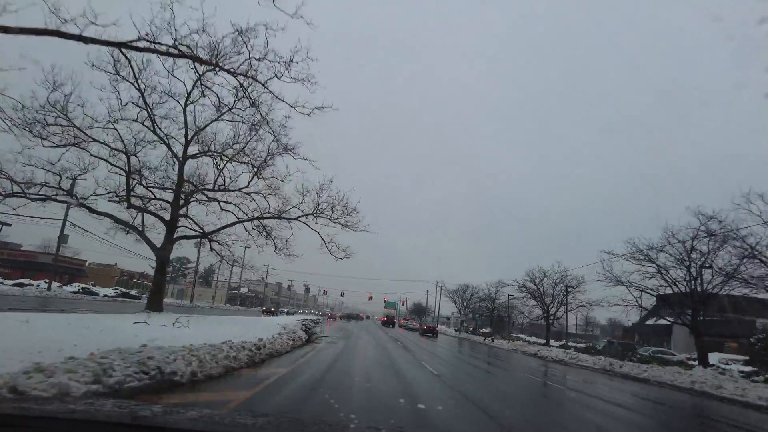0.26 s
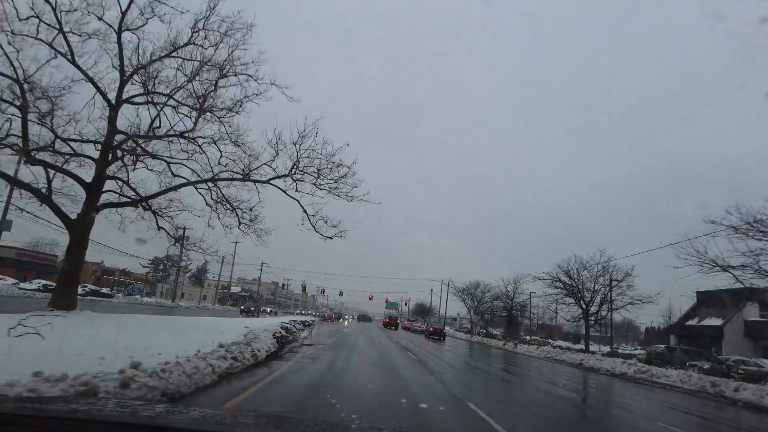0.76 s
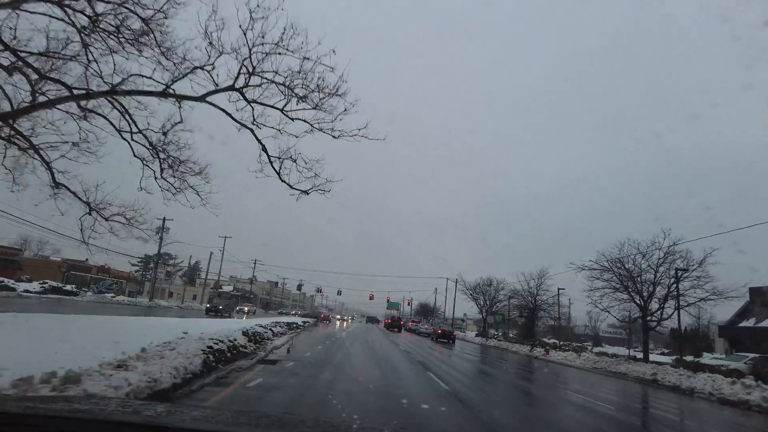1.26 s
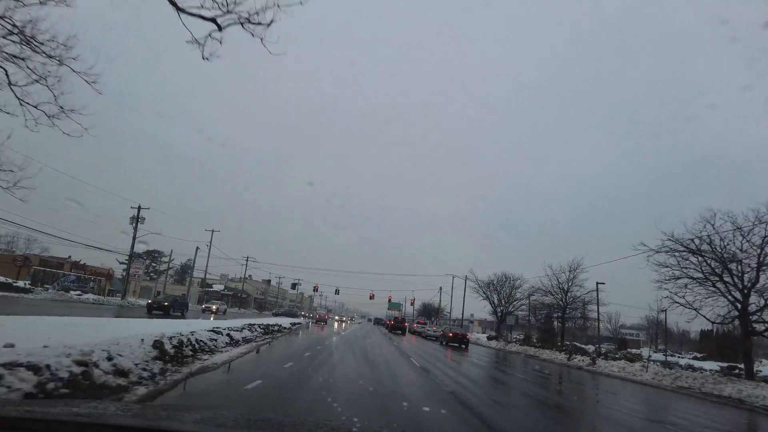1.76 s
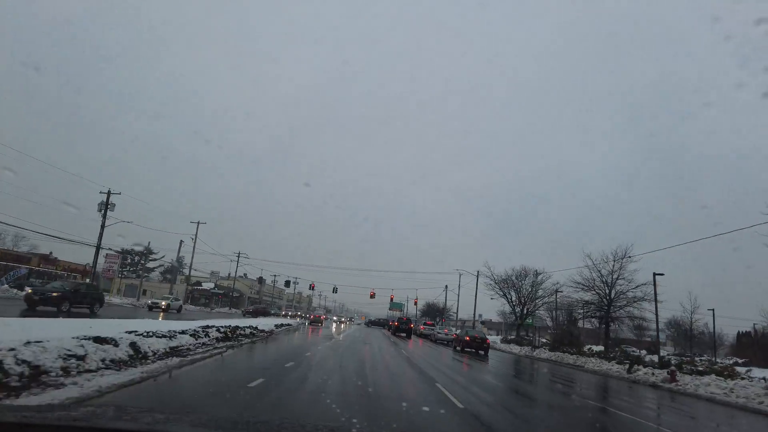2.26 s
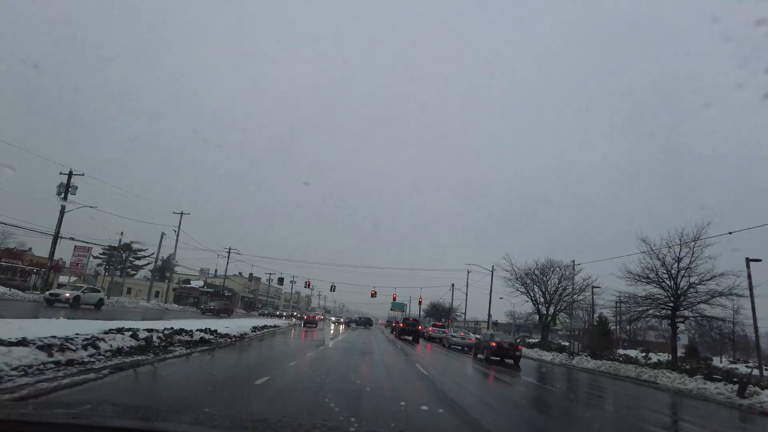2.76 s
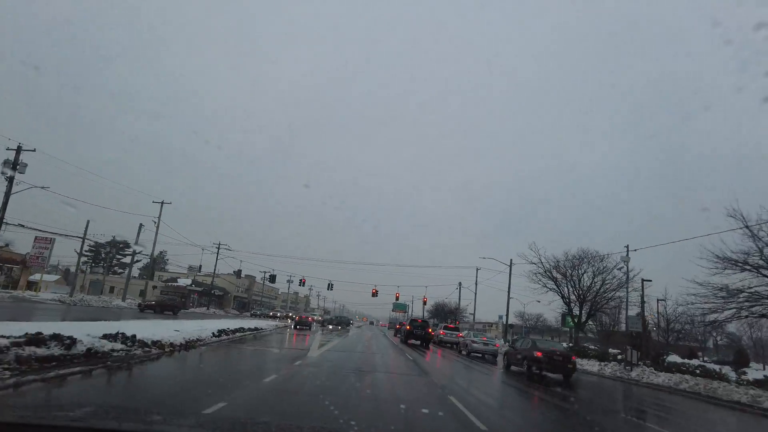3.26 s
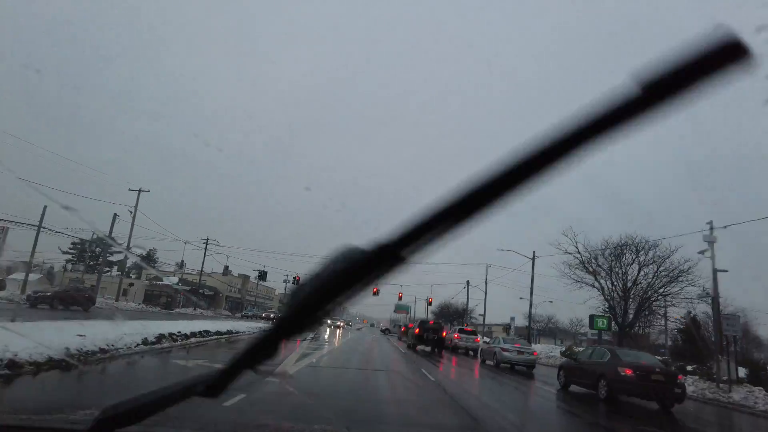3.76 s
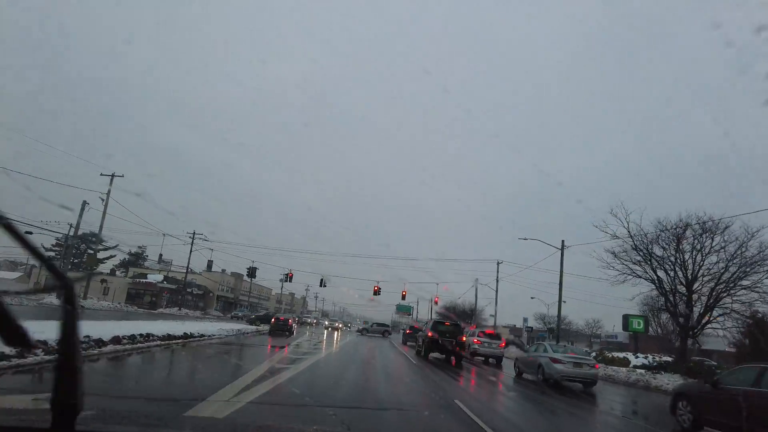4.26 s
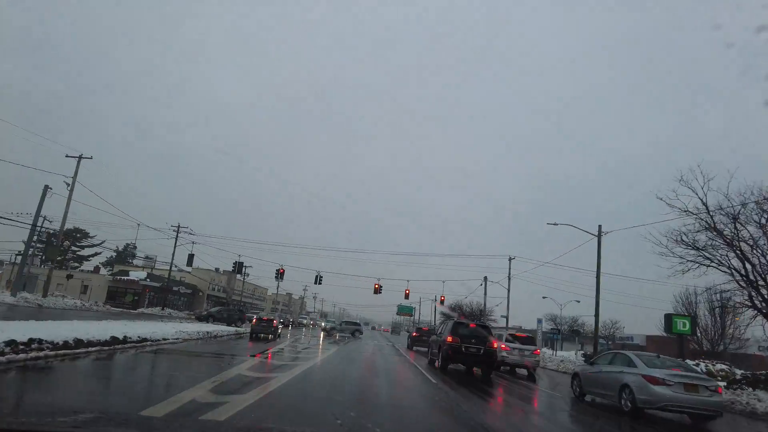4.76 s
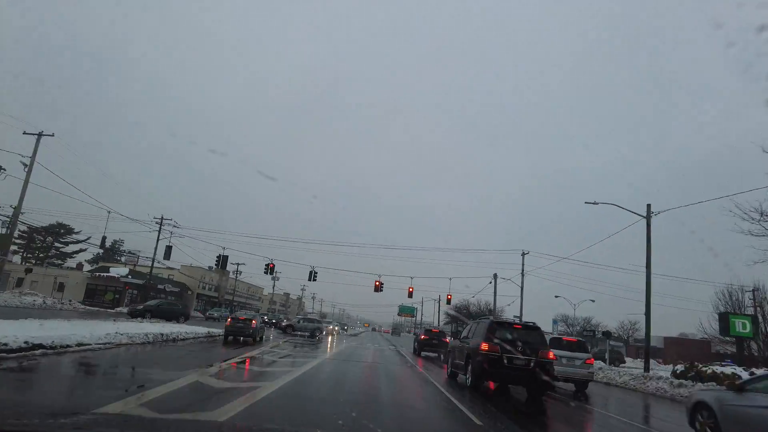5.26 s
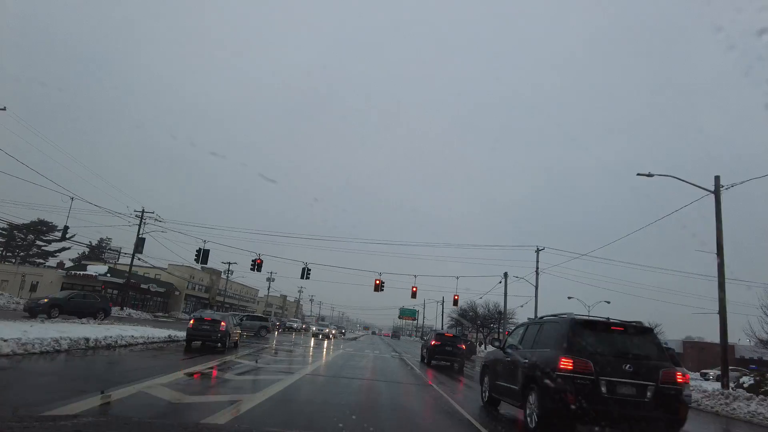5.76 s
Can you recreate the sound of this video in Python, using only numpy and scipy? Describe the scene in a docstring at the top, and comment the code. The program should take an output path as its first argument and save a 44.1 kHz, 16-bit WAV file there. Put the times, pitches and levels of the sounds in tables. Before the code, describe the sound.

Steady bassy road noise heard from the dashboard of a closed car, pulsing unevenly with the surface, with faint fan whine and barely audible drops. One wiper stroke interrupts it: a soft low thump, then a brief squeak and crisp rattling clack on the windscreen, then a light rubbery tick. The rumble continues while the air hiss gently fades, with a couple of muffled bumps near the end.

```python
"""Inside a car that slows down on a wet road: the cabin booms near 38 Hz over tyre and air noise.
The boom is a sine that swells over a narrow murmur; rumble, body, hiss and spray are shaped noise.
The wipers make one sweep: low thuds as they start and flip over, knocks that ring the windscreen,
small ticks and rubber chirps of resonant noise; dull low bumps follow once they have parked.
A fan motor whines as a thin sine; drops tick faintly."""
import sys
import numpy as np
from scipy import signal
from scipy.io import wavfile
from scipy.ndimage import uniform_filter1d

SR = 44100
rng = np.random.default_rng(int(sys.argv[2]) if len(sys.argv) > 2 else 0)


def to_linear_factor(level_db):
    """Convert decibel levels (scalar or array-like) to linear amplitude factors."""
    exponent = np.asarray(level_db, float) / 20
    return 10 ** exponent


def output_pcm(signal):
    """Save a mono or channel-first signal as 16-bit PCM at the path in sys.argv[1].

    Samples are clipped to [-1, 1] before scaling.
    """
    pcm = np.clip(np.atleast_2d(signal).T, -1, 1) * 32767
    wavfile.write(sys.argv[1], SR, np.round(pcm).astype(np.int16))


N = 265923

# boom swells on uneven road: (time of top [s], rms level [dB], width at half amplitude [s])
BOOM_SWELLS = [(0.083, -30, 0.03), (0.166, -26, 0.066), (0.259, -28, 0.11), (0.356, -28, 0.038),
               (0.461, -27.5, 0.13), (0.773, -32.5, 0.07), (0.878, -34.5, 0.046), (1.057, -33, 0.11),
               (1.138, -28, 0.057), (1.283, -33, 0.13), (1.416, -26, 0.046), (1.511, -28, 0.14),
               (1.739, -25.5, 0.12), (1.991, -24.5, 0.12), (2.181, -29, 0.1), (2.4, -36, 0.24),
               (2.563, -26, 0.047), (2.712, -35, 0.21), (2.862, -32.5, 0.12), (2.972, -31.5, 0.065),
               (3.187, -33, 0.055), (3.423, -30, 0.092), (3.48, -30.5, 0.074), (3.617, -30, 0.041),
               (3.78, -35, 0.15), (3.919, -33, 0.04), (4.018, -32, 0.024), (4.26, -48, 0.051),
               (4.407, -30, 0.059), (4.546, -33, 0.14), (4.741, -38, 0.085), (4.845, -32.5, 0.041),
               (5.06, -29.5, 0.028), (5.206, -36.5, 0.069), (5.31, -32, 0.051), (5.678, -29.5, 0.037),
               (5.826, -31, 0.21), (6.029, -28.5, 0.081)]
# boom pitch before its random waver: (time [s], frequency [Hz])
BOOM_PITCH = [(0.0, 39.7), (0.07, 37.8), (0.72, 38.07), (0.79, 38.06), (1.48, 38.86), (1.59, 37.49),
              (2.75, 36.57), (2.84, 39.59), (3.32, 41.03), (3.41, 38.84), (4.59, 37.47), (4.72, 31.15),
              (4.82, 31), (4.9, 35.06), (5.24, 40.02), (6.03, 38.58)]
# wiper arms jerk off their rests and turn at the top: (time [s], peak [dB], frequency [Hz], rise [s])
THUDS = [(3.5815, -31, 176, .0095), (4.2215, -38, 265, .008), (4.2225, -41, 420, .006),
         (4.2355, -42, 450, .008), (4.228, -37.5, 162, .026)]
# blade blows on the glass: (time [s], gain [dB], time to peak push [s], tilt [dB/octave], share of free t60 [1])
KNOCKS = [(3.603, -47, .005, -6.5, .6), (3.622, -49, .006, -6.5, .6), (3.655, -52, .008, -7, .7),
          (4.2205, -47, .0006, -2.5, .4), (4.2235, -46, .0004, 0, .35), (4.226, -41, .0002, 0.5, .4),
          (4.2285, -43, .0006, 0, .5), (4.2298, -43, .0008, -3, .5), (4.2335, -44, .0008, -1.5, .6),
          (4.238, -46, .001, -3, 1.2), (4.243, -50, 0.002, -2, 0.4), (4.258, -48, 0.0012, -2.5, 0.3)]
# windscreen and arm modes: (frequency [Hz], level before tilt [dB], free t60 [s])
GLASS_MODES = [(156.6, -12.5, 0.49), (192, -4.5, 0.033), (255.2, 3, 0.066), (342, -8, 0.081),
               (390, 4, 0.068), (560, 2.5, 0.074), (727, 2, 0.052), (930, -3, 0.07), (1150, -6, 0.071),
               (1250, -2, 0.086), (1487.6, 0, 0.046), (1860, -4.5, 0.027), (2090, -7.5, 0.084),
               (2420, -10, 0.025), (2730, -17.5, 0.019), (3080, -18.5, 0.014), (3800, -15, .015),
               (4470, -16, 0.032), (5600, -12, 0.015), (7100, -15.5, 0.012), (9000, -26, 0.0088)]
# broad ticks of drops and catching rubber: (time [s], level [dB], centre [Hz], t60 [s])
TICKS = [(0.021, -80, 7000, 0.066), (0.428, -59.5, 3800, 0.015), (0.501, -65, 3600, 0.022),
         (.5, -74, 6500, 0.017), (.805, -73, 7300, 0.018), (.83, -80.5, 9850, 0.079),
         (3.392, -71.5, 9000, 0.031), (3.584, -66, 3605, 0.078), (3.615, -69.5, 3800, 0.076),
         (3.716, -63.5, 3000, 0.039), (3.797, -75, 3980, 0.052), (3.86, -61, 3485, 0.038),
         (4.023, -68, 5760, 0.061), (4.136, -57.5, 3492, 0.06), (4.145, -70, 3600, 0.03),
         (4.154, -65, 3400, 0.03), (4.182, -63, 5000, 0.04), (4.194, -66, 6000, 0.053),
         (4.267, -62, 4600, 0.053), (4.671, -72, 4970, 0.046), (4.76, -75.5, 8000, 0.16),
         (4.769, -66, 3202, 0.06), (4.781, -56, 2600, 0.036), (4.787, -62, 4050, 0.03),
         (4.793, -62, 3000, 0.049), (4.799, -62, 2501, .04), (4.8047, -50.5, 3300, .011),
         (4.808, -59, 2200, 0.062), (4.226, -47.5, 3330, 0.055), (4.242, -73, 7000, 0.055),
         (4.129, -66, 10930, .07)]
# narrow chirps of rubber, then dull low bumps after the wipers have parked:
# (time [s], level [dB], start frequency [Hz], t60 [s], slide [octave/s])
CHIRPS_AND_BUMPS = [(4.124, -65, 7940, 0.037, 0), (4.133, -57, 4420, 0.037, -2),
                    (4.157, -68, 6400, 0.05, 0), (4.168, -70, 6500, .045, -9), (4.163, -66, 3900, .04, -4),
                    (4.171, -63, 4200, .035, -5), (4.178, -87, 13200, .12, 0),
                    (4.184, -65, 4800, 0.045, -6), (4.185, -64, 6000, 0.05, 8),
                    (4.681, -74.5, 9400, 0.1, -7), (4.746, -73, 7400, 0.09, -4),
                    (4.756, -71, 7000, 0.045, -40), (4.77, -77, 9700, .08, -6),
                    (4.773, -53.5, 1150, 0.068, 1), (4.81, -69, 3806, 0.039, 4), (5.613, -49, 680, .05, 0),
                    (5.616, -52, 1000, 0.035, -1), (5.749, -54, 756, 0.03, -2)]
# blade edge snaps over: (time [s], level [dB], lowest frequency [Hz], t60 [s])
SNAPS = [(4.129, -63, 4200, 0.05), (4.828, -60.5, 3540, 0.047)]
# overtones of a snap: (multiple [1], relative level [dB], width as share of the ring's pitch [1])
SNAP_RINGS = [(1, 1, 0.65), (2, -8, 0.16), (3, -9.5, 0.38), (4, -13, .2)]
# fan motor pitch before its wobble: (time [s], frequency [Hz])
WHINE_PITCH = [(0, 843), (.7, 838), (1.5, 845), (2.8, 848), (4.1, 846), (4.4, 851), (5, 848), (5.6, 843),
               (6.03, 844)]
# tyre rumble spectrum: (frequency [Hz], relative density [dB/Hz])
RUMBLE_SPECTRUM = [(2, -11), (8.8, -4.5), (15, -6), (27, -14.5), (43, -19.5), (56, -9), (70, -17),
                   (124, -20.5), (178, -27.5), (248, -28.5), (287, -25), (332, -30.5), (471, -34.5),
                   (620, -47.5), (863, -48.5), (1200, -48.5), (1560, -78), (2640, -120)]
# body resonances: (frequency [Hz], width of each of two passes [Hz], relative level [dB])
BODY_MODES = [(23.8, 20.3, 8.5), (80.4, 27, -3.5), (121.5, 14, -4), (171.2, 36.4, -5.5), (396.6, 71, -15.5),
              (1545, 190, -32)]
# how hard the surface shakes the body: (time [s], level [dB])
ROUGH_ROAD = [(0, -52), (.45, -51.5), (.53, -46.5), (.72, -49), (1.75, -50.5), (1.85, -45.5), (1.93, -47.5),
              (2.3, -49), (2.41, -50), (2.46, -46.5), (2.57, -50), (3.45, -48), (3.55, -48.5), (3.9, -48.5),
              (4.2, -49.5), (4.62, -51.5), (4.7, -47), (5.15, -54), (5.22, -48), (5.4, -48), (5.46, -60),
              (5.52, -48), (5.6, -53), (5.79, -44), (5.89, -53), (6.03, -47)]
# air hiss spectrum: (frequency [Hz], relative density [dB/Hz])
HISS_SPECTRUM = [(290, -27), (500, 0.5), (800, -3), (1370, -12), (1600, -13), (2500, -20), (3500, -28),
                 (4500, -31.5), (5100, -41), (7000, -47.5), (12000, -58.5), (22000, -110)]
# spray spectrum: (frequency [Hz], relative density [dB/Hz])
SPRAY_SPECTRUM = [(3500, -31.5), (5000, -5.5), (6200, -0.5), (7600, -1), (9000, -6), (12800, -17),
                  (16000, -28), (22000, -61.5)]

# Air hiss falls by this from start to end as the car slows; other layers follow by a share of it.
SLOWING_DB = 3.5


def evened(x):
    """Scales to rms 1."""
    return x / np.sqrt(np.mean(x ** 2) + 1e-20)


def curve(rows):
    """Second column of a table over its times, one value a sample."""
    time_s, value = np.transpose(rows)
    return np.interp(np.arange(N) / SR, time_s, value)


def add(mix, time_s, sound):
    """Mixes a sound in at time_s."""
    part = mix[round(time_s * SR):][:len(sound)]
    part += sound[:len(part)]


def resonate(x, hz, width_hz):
    """Resonance of gain 1: shifts hz down to zero, smooths with one pole, shifts back."""
    turn = np.exp(2j * np.pi * np.cumsum(hz * np.ones(len(x))) / SR)
    pole = np.exp(-np.pi * width_hz / SR)
    return 2 * (turn * signal.lfilter([1 - pole], [1, -pole], x / turn)).real


def resonate_twice(x, hz, width_hz):
    """Two equal resonances in series, for steeper skirts."""
    return resonate(resonate(x, hz, width_hz), hz, width_hz)


def drift(per_s):
    """Slow chance of rms 1: noise averaged twice over 1 / per_s seconds."""
    span = max(int(SR / per_s), 1)
    return evened(uniform_filter1d(uniform_filter1d(rng.standard_normal(N), span), span))


def wash(spectrum, patchy_db, gusty_db, size):
    """Noise from random short-time spectra with drifting patches and a flicker shared by all pitches."""
    hz = np.fft.rfftfreq(size, 1 / SR)
    frames = 4 * N // size + 5
    real, imag, patches = rng.standard_normal((frames, len(hz), 3)).T
    patches = uniform_filter1d(patches, size=size // 64, axis=0)  # along frequency
    patches = evened(uniform_filter1d(patches, size=8, axis=1))  # along time
    gusts = evened(uniform_filter1d(rng.standard_normal(frames), size=5))
    table_hz, table_db = np.transpose(spectrum)
    colour_db = np.interp(np.log(hz + 1), np.log(table_hz + 1), table_db)[:, None]
    z = (real + 1j * imag) * to_linear_factor(colour_db + patchy_db * patches + gusty_db * gusts)
    return evened(signal.istft(z, nperseg=size, noverlap=size * 3 // 4)[1][:N])


def boom():
    """Cabin boom near 38 Hz: a wavering tone swells on uneven road over a random murmur near its pitch."""
    hum_db, bed_db = -44, -51  # hum: floor of the tone
    bed_hz, bed_width_hz = 37.4, 14
    t = np.arange(0, N + 64, 64) / SR
    power = to_linear_factor(hum_db) ** 2
    for top_s, db, width_s in BOOM_SWELLS:
        power = power + to_linear_factor(db) ** 2 * 0.5 ** (2 * (2 * (t - top_s) / width_s) ** 2)
    rms = np.interp(np.arange(N) / SR, t, np.sqrt(power))
    hz = curve(BOOM_PITCH) + 2.668 * drift(31.6)
    tone = np.sqrt(2) * rms * np.sin(2 * np.pi * np.cumsum(hz) / SR)
    bed = resonate_twice(rng.standard_normal(N), bed_hz, bed_width_hz)
    return tone + to_linear_factor(bed_db) * evened(bed)


def thud(peak_db, hz, rise_s):
    """Wiper arm jerk: a few low cycles that swell and stop."""
    t = np.arange(SR // 8) / SR
    swell = (t / rise_s * np.exp(1 - t / rise_s)) ** 3
    return to_linear_factor(peak_db) * swell * np.sin(2 * np.pi * hz * t)


def knock(gain_db, spread_s, tilt_db, free_share):
    """Blade lands along its length within a moment; each landing point shakes the modes differently."""
    steady_push = 0.3  # smooth part beside the rattle, drives the low modes
    soft_top_hz = 12000  # the rubber edge softens the top of a blow
    t = np.arange(SR // 5) / SR
    push = t / spread_s * np.exp(1 - t / spread_s)
    sound = np.zeros(len(t))
    for hz, level_db, t60_s in GLASS_MODES:
        mode = to_linear_factor(-60 * t / (free_share * t60_s)) * np.sin(2 * np.pi * hz * t)
        rattle = steady_push * rng.choice([-1, 1]) + rng.standard_normal(len(t))
        ring = signal.fftconvolve(push * rattle, mode)[:len(t)]
        octaves = np.log2(hz / GLASS_MODES[0][0])
        sound += to_linear_factor(level_db + tilt_db * octaves) * ring / abs(ring).max()
    softener = signal.butter(6, soft_top_hz, fs=SR, output="sos")
    return to_linear_factor(gain_db) * signal.sosfilt(softener, sound)


def resonant_burst(db, hz, t60_s, width_share, slide=0, tone=0):
    """Short noise burst, part of it a clear ring, through three equal resonances that may slide."""
    rise_share = 0.03  # rise constant as share of t60
    t = np.arange(SR // 8) / SR
    shape = to_linear_factor(-60 * t / t60_s) * (1 - np.exp(-t / (rise_share * t60_s))) ** 2
    sliding_hz = hz * 2 ** (slide * t)
    ring = np.sqrt(2) * np.sin(2 * np.pi * np.cumsum(sliding_hz) / SR)
    ring *= np.sqrt(width_share * hz / SR)  # near the noise left in the band
    burst = shape * ((1 - tone) * rng.standard_normal(len(t)) + tone * ring)
    for _ in range(3):
        burst = resonate(burst, sliding_hz, width_share * hz)
    return to_linear_factor(db) * burst * np.linalg.norm(shape) / np.linalg.norm(burst)  # energy of the shape


def tick(db, hz, t60_s):
    """Drop or catching rubber: a broad noise burst."""
    return resonant_burst(db, hz, t60_s, width_share=0.98)


def chirp_or_bump(db, hz, t60_s, slide):
    """Chirp or dull bump: a narrow burst, part clear ring, that may slide."""
    return resonant_burst(db, hz, t60_s, width_share=0.26, slide=slide, tone=0.35)


def snap(db, lowest_hz, t60_s):
    """Blade edge snaps over and rings with overtones, each a band of noise."""
    return sum(resonant_burst(db + ring_db, multiple * lowest_hz, t60_s, width_share)
               for multiple, ring_db, width_share in SNAP_RINGS)


def whine():
    """Fan motor: a thin tone of nearly steady pitch that flickers a little in strength."""
    level_db = -68 + 0.8 * drift(25)
    hz = curve(WHINE_PITCH) + 1.2 * drift(40)
    return np.sqrt(2) * to_linear_factor(level_db) * np.sin(2 * np.pi * np.cumsum(hz) / SR)


def slowing_db():
    """Fall in level with speed, linear in dB."""
    return -SLOWING_DB * np.arange(N) / N


def rumble():
    """Tyre rumble: low noise that barely fades with speed."""
    level_db = -43 + 0.026 * slowing_db() + 0.1 * drift(4.8)
    return to_linear_factor(level_db) * wash(RUMBLE_SPECTRUM, patchy_db=0.54, gusty_db=1.0, size=4096)


def body():
    """Body resonances shaken by the road; each shifts in pitch and swells on its own."""
    wander, lumps_db = 0.04, 1.5  # rms pitch shift as share, reduced above 200 Hz; rms swell
    usual_rough_db, rough_share = -49, 0.94
    rings = np.zeros(N)
    for hz, width_hz, db in BODY_MODES:
        moving_hz = hz * (1 + wander * np.minimum(1, 200 / hz) * drift(1.5))
        ring = evened(resonate_twice(rng.standard_normal(N), moving_hz, width_hz))
        rings += to_linear_factor(db + lumps_db * drift(6)) * ring
    rough_db = rough_share * (curve(ROUGH_ROAD) - usual_rough_db)
    return to_linear_factor(-50 + rough_db + 0.21 * slowing_db() + 0.75 * drift(14)) * rings


def hiss():
    """Air noise that fades as the car slows."""
    level_db = -59 + slowing_db() + 0.5 * drift(2.3)
    return to_linear_factor(level_db) * wash(HISS_SPECTRUM, patchy_db=0.55, gusty_db=0.99, size=1024)


def spray():
    """Patchy treble fizz of spray that fades faster than the air noise."""
    level_db = -88.5 + 1.6 * slowing_db() + 1.0 * drift(1.5)
    return to_linear_factor(level_db) * wash(SPRAY_SPECTRUM, patchy_db=1.0, gusty_db=2.5, size=1024)


def spatter(rms_db, per_s, low_hz, high_hz):
    """Drops of sleet and spray tick on glass and body: random impulses ring one of 12 short noise taps."""
    size = to_linear_factor(3.5 * np.minimum(rng.exponential(1, N), 3.5)) * (rng.random(N) < per_s / SR)
    spot = rng.integers(0, 12, N)
    t = np.arange(900) / SR
    out = np.zeros(N)
    for k, hz in enumerate(np.geomspace(low_hz, high_hz, 12)):
        decaying = rng.standard_normal(len(t)) * to_linear_factor(-60 * t / 0.038)
        tap = resonate_twice(decaying, hz, hz / 4)
        out += signal.oaconvolve(size * (spot == k), tap)[:N]
    return to_linear_factor(rms_db) * evened(out)


def scene():
    """All sources as one microphone on the dashboard hears them."""
    mix = boom()
    for table, source in ((THUDS, thud), (KNOCKS, knock), (TICKS, tick),
                          (CHIRPS_AND_BUMPS, chirp_or_bump), (SNAPS, snap)):
        for time_s, *row in table:
            add(mix, time_s, source(*row))
    mix += whine() + rumble() + body() + hiss() + spray()
    mix += spatter(-101, per_s=90, low_hz=3700, high_hz=10500)
    mix += spatter(-92, per_s=350, low_hz=2600, high_hz=5200)
    return mix[None]


def top_cut(x):
    """Nothing passes above the cut-off."""
    return signal.sosfilt(signal.butter(12, 15300, fs=SR, output="sos"), x)


def record(dry):
    """Stores the finished mix, with no gain change before that."""
    return top_cut(dry)


dry = scene()
out = record(dry)
output_pcm(out)
```